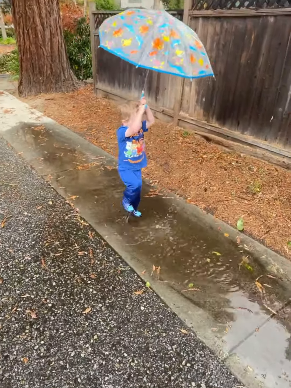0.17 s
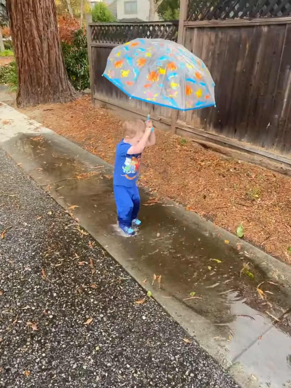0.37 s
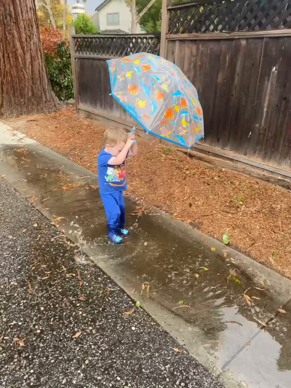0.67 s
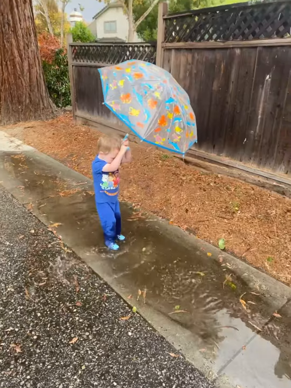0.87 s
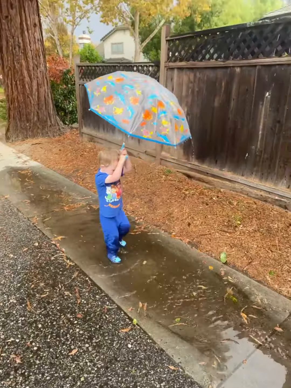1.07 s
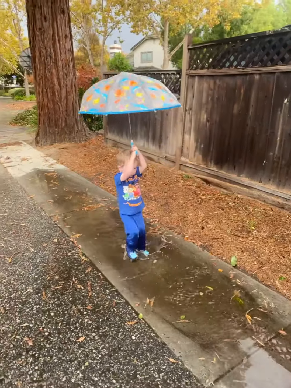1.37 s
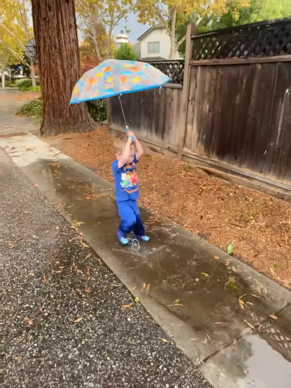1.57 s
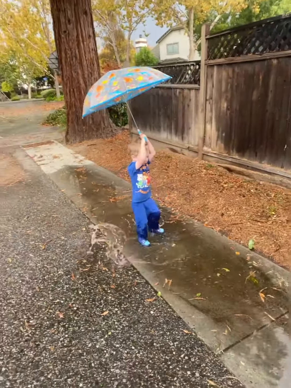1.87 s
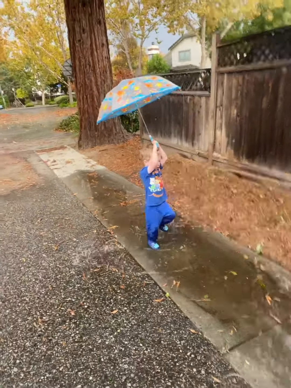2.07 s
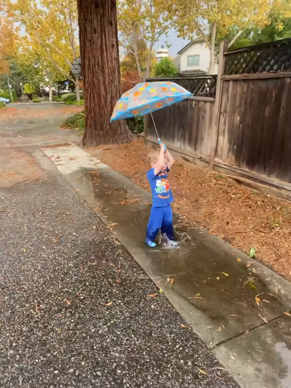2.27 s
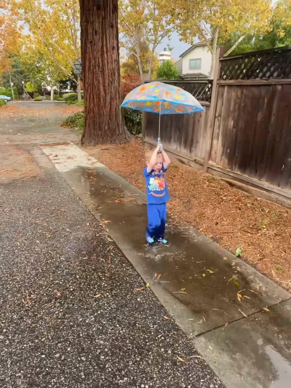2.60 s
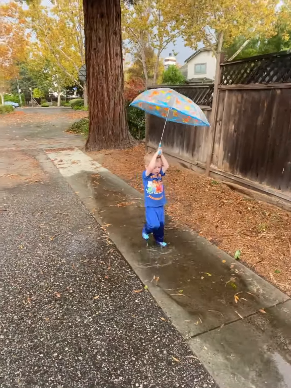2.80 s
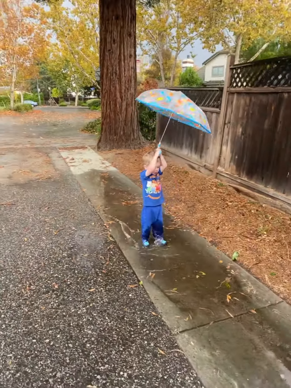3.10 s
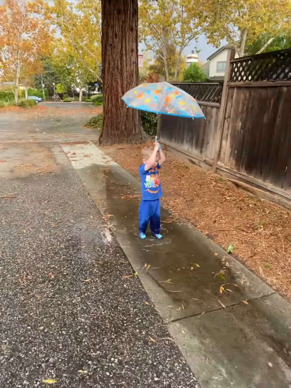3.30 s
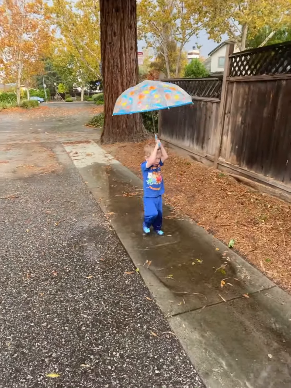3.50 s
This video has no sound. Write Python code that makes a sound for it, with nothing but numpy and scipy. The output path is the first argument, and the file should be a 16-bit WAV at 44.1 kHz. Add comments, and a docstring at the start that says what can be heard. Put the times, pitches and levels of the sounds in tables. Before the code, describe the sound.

Sharp splashing stomps in a shallow puddle outdoors, followed by spattering drops and small bubbly plinks.

```python
"""A small child stomps five times in a shallow gutter puddle, a few metres from the microphone.
Soles crack on the water (filtered pulses), squeeze out air pockets (falling sines) and throw spray (clicks).
Water patters back as ringing droplets, noise pings and rising bubble sines; a kicked sheet slaps down.
Echoes follow the water. Wind rumbles over quiet outdoor air; the sound cuts out briefly three times."""
import sys
import numpy as np
from scipy import signal
from scipy.fft import rfft, irfft
from scipy.io import wavfile
from scipy.ndimage import uniform_filter1d

SR = 44100
rng = np.random.default_rng(int(sys.argv[2]) if len(sys.argv) > 2 else 0)


def waveform_to_disk(signal):
    """Save audio, clipped to [-1, 1], as 16-bit WAV at the path in sys.argv[1]."""
    frames = np.transpose(np.atleast_2d(signal))
    scaled = np.clip(frames, -1, 1) * 32767
    samples = np.round(scaled).astype(np.int16)
    wavfile.write(sys.argv[1], SR, samples)


N = 160965


def amp(db):
    """Decibels to gain."""
    return 10 ** (np.asarray(db) / 20)


def unit(x):
    """Scales to rms 1."""
    return x / np.sqrt(np.mean(x ** 2) + 1e-20)


def add(mix, s, sound):
    """Mixes a sound in at time s."""
    part = mix[max(round(s * SR), 0):][:len(sound)]
    part += sound[:len(part)]


def colour(x, points, tilt_db_per_oct=0, size=4096):
    """Minimum-phase, unit-energy filter through (f/Hz, level/dB) points, tilted above 600 Hz."""
    octave = np.log2(np.fft.rfftfreq(size, 1 / SR) + 1)
    hz, db = np.transpose(points)
    curve_db = np.interp(octave, np.log2(hz), db)
    curve_db = curve_db + tilt_db_per_oct * np.maximum(octave, np.log2(600))
    # folding the cepstrum makes the filter causal
    cepstrum = irfft(np.log(amp(curve_db)))
    cepstrum[1:size // 2] *= 2
    cepstrum[size // 2 + 1:] = 0
    taps = irfft(np.exp(rfft(cepstrum)))
    return signal.fftconvolve(x, taps / np.linalg.norm(taps))[:len(x)]


def drift(hz):
    """Slow random wander of rms 1: noise under a Gaussian low-pass."""
    lowpass = np.exp(-(np.fft.rfftfreq(N, 1 / SR) / hz) ** 2)
    return unit(irfft(rfft(rng.standard_normal(N)) * lowpass, N))


def clicks(per_s, spread_db):
    """Random impacts of uneven size and either sign, rms 1."""
    size = amp(spread_db * np.minimum(rng.exponential(1, N), 4))
    sign = rng.choice([-1, 1], N)
    return unit(size * sign * (rng.random(N) < per_s / SR))


CLUMP_DB, CLUMP_HZ = 4.5, 200


def clumped(x):
    """Water comes in uneven spurts of a few milliseconds."""
    return unit(x * amp(CLUMP_DB * np.tanh(drift(CLUMP_HZ))))


def shower(s, rise_s, fall_s):
    """Water arrives gradually, peaks at s and thins out."""
    t = np.arange(N) / SR
    return np.exp(-(abs(t - s) / np.where(t < s, rise_s, fall_s)) ** 1.5 / 2)


# wind buffets and low thuds: t/s, level/dB, half length/s
BUFFETS = [(0.19, -45, 0.023), (0.247, -36.5, 0.0044), (0.651, -41, 0.0085), (1.587, -44.5, 0.023),
           (1.813, -45.5, 0.024), (1.936, -41.5, 0.0072), (2.26, -33.5, 0.0088), (2.296, -36, 0.008),
           (2.768, -41, 0.014)]
# wind rumble spectrum: f/Hz, level/dB
WIND_SPECTRUM = [(30, -55), (50, -11), (78, -1.5), (115, -8), (170, -11.5), (260, -15), (450, -49.5),
                 (2000, -97.5)]
# outdoor air spectrum: f/Hz, level/dB
AIR_SPECTRUM = [(40, -46.5), (130, 6), (280, 1), (400, -4), (600, -4.5), (950, -1), (1600, -6), (2500, -13),
                (8000, -32), (16000, -44.5)]
BUFFET_HZ, BUFFET_WANDER = 84.4, 0.1886  # wander: rms share of pitch
WIND_DB, GUST_DB, GUST_HZ, AIR_DB = -52, 2.5, 2.8, -52


def wind():
    """Gusty low noise and single wavering low-pitched buffets, over steady outdoor air."""
    t = np.arange(N) / SR
    gusts = amp(WIND_DB + GUST_DB * drift(GUST_HZ))
    rumble = gusts * unit(colour(rng.standard_normal(N), WIND_SPECTRUM, size=16384))
    swell = sum(amp(db) * np.exp(-((t - s) / half_s) ** 2 / 2) for s, db, half_s in BUFFETS)
    pitch_hz = BUFFET_HZ * (1 + BUFFET_WANDER * drift(34.6))
    buffets = np.sqrt(2) * swell * np.sin(2 * np.pi * np.cumsum(pitch_hz) / SR)
    air = amp(AIR_DB) * unit(colour(rng.standard_normal(N), AIR_SPECTRUM))
    return rumble + buffets + air


DROP_SPREAD_DB, DROP_CYCLES = 3.7, 6  # spread of sizes; cycles to decay by 1/e
DROP_CLIMB = 0.0099  # share of pitch gained per cycle


def droplets(per_s, count=48):
    """Random drops, each ringing a few cycles at its own rising pitch; rms 1."""
    out = np.zeros(N)
    for hz in np.geomspace(550, 11500, count):
        cycles = np.arange(int(5 * DROP_CYCLES * SR / hz)) * hz / SR
        shape = (1 - np.exp(-2 * cycles)) * np.exp(-cycles / DROP_CYCLES)
        ring = shape * np.sin(2 * np.pi * cycles * (1 + DROP_CLIMB * cycles / 2))
        chance = rng.random(N) * SR * count / per_s
        for at in np.flatnonzero(chance < 1):
            size = amp(DROP_SPREAD_DB * min(-np.log(chance[at]), 3))
            add(out, at / SR, size * np.sqrt(hz) * ring)  # root: even energy across pitches
    return unit(out)


SPRAY_PER_S, SPRAY_SPREAD_DB = 9000, 2.8
# thrown water coming down: densest t/s, level/dB, rise/s, fall/s, brightness/(dB per octave)
SPLATTERS = [(.725, -50, 0.079, 0.15, 0.5), (1.572, -45.5, 0.051, 0.085, 0.5),
             (1.82, -55, 0.021, 0.096, 1.5), (1.99, -50.5, 0.043, 0.058, 3.5),
             (2.541, -49.5, 0.11, 0.084, 0), (3.22, -47, 0.039, 0.043, -1)]
# falling water spectrum: f/Hz, level/dB
PATTER_SPECTRUM = [(300, -16), (900, 1.5), (1700, 6), (2900, 1), (5200, -5.5), (8500, -16), (16000, -31)]
DROPS_PER_S, DRIPS_PER_S = 1800, 160
MIST_DB, DRIP_DB = -6, -63.5  # mist relative to the droplets


def splatter():
    """Showers of ringing drops and fine click mist, with stray drips at all times."""
    rain = droplets(DROPS_PER_S) + amp(MIST_DB) * clicks(SPRAY_PER_S, SPRAY_SPREAD_DB)
    out = np.zeros(N)
    for s, db, rise_s, fall_s, tilt in SPLATTERS:
        out += amp(db) * shower(s, rise_s, fall_s) * unit(colour(rain, PATTER_SPECTRUM, tilt))
    return out + amp(DRIP_DB) * unit(colour(droplets(DRIPS_PER_S), PATTER_SPECTRUM))


# air squeezed from under a sole: t/s, level/dB, first f/Hz, time to halve f above POCKET_LOW_HZ/s, decay/s
POCKETS = [(0.3777, -17.5, 2000, 0.00082, 0.0051), (.382, -24, 327, 0.0093, 0.012),
           (0.3882, -26, 2113, 0.017, 0.0072), (1.2724, -6.5, 2530, 0.0045, 0.0006),
           (1.2804, -22.5, 2830, 0.0015, 0.0016), (1.6006, -21.5, 1325, 0.00543, 0.0046),
           (1.617, -25.5, 393, 0.0058, 0.012), (2.215, -13.5, 3100, 0.00287, 0.0014),
           (2.2162, -28, 1300, 0.0084, 0.0036), (2.225, -32.5, 1814, 0.00072, 0.01),
           (2.9541, -25.5, 1960, 0.0013, 0.0021), (2.973, -32.5, 375, 0.005, 0.0059)]
POCKET_RISE_S, POCKET_LOW_HZ = 0.0006, 111


def pockets():
    """A pocket of air pops, its pitch diving as the cavity opens."""
    out, t = np.zeros(N), np.arange(SR // 12) / SR
    for s, db, hz, half_s, decay_s in POCKETS:
        pitch_hz = POCKET_LOW_HZ + (hz - POCKET_LOW_HZ) / (1 + t / half_s)
        shape = (1 - np.exp(-t / POCKET_RISE_S)) * np.exp(-t / decay_s)
        add(out, s, amp(db) * shape * np.sin(2 * np.pi * np.cumsum(pitch_hz) / SR))
    return out


# sharp smacks of a sole's edge: t/s, pulse level/dB, crackle width/s
SMACKS = [(0.3779, -15.5, 0.0012), (1.2738, -23, 0.0012), (1.5864, -23, 0.0014), (1.6003, -30, 0.0015),
          (2.2133, -26.5, .0007), (2.216, -29, .0005)]
# smack spectrum: f/Hz, level/dB
SMACK_SPECTRUM = [(200, 2.5), (2500, 16), (5000, 9.5), (12000, -8), (16000, -32)]
CRACKLE_DB = -14  # relative to the pulse, before filtering


def smacks():
    """The sole's edge meets the water: a sharp pulse inside a brief swell of crackle."""
    out, middle = np.zeros(N), SR // 60
    t = (np.arange(2 * middle) - middle) / SR
    pulse = signal.unit_impulse(2 * middle, middle)
    for s, db, width_s in SMACKS:
        crackle = amp(CRACKLE_DB) * rng.standard_normal(len(t)) * np.exp(-abs(t) / width_s)
        smack = colour(crackle - pulse, SMACK_SPECTRUM) / colour(pulse, SMACK_SPECTRUM).max()
        add(out, s - middle / SR, amp(db) * smack)
    return out


# spray from under a sole: t/s, level/dB, hold/s, decay/s, brightness/(dB per octave)
STOMPS = [(0.3811, -32, 0.013, 0.006, 1), (1.276, -35, 0.007, 0.01, 2), (1.596, -28.5, 0.0043, 0.016, -1),
          (2.2115, -29.5, 0.0021, 0.0096, 3), (2.9379, -38.5, 0.0058, 0.026, 1.5)]
# spray spectrum: f/Hz, level/dB
SPRAY_SPECTRUM = [(100, 11), (500, 7), (1800, 2.5), (3200, -3), (5200, -7.5), (8500, -18), (12000, -30.5),
                  (16000, -35)]
SPRAY_RISE_S, BASS_LAG_S, BASS_HZ = 0.001, 0.0033, 866


def sprays():
    """Water tears into dense droplets while the sole comes down: treble first, then bass."""
    out, t = np.zeros(N), np.arange(SR // 5) / SR
    highpass = signal.butter(2, BASS_HZ, "high", fs=SR, output="sos")
    full = 1 - np.exp(-(t / BASS_LAG_S) ** 2)
    for s, db, hold_s, decay_s, tilt in STOMPS:
        shape = np.minimum(t / SPRAY_RISE_S, 1) * np.exp(-np.maximum(t - hold_s, 0) / decay_s)
        grains = clumped(clicks(SPRAY_PER_S, SPRAY_SPREAD_DB))[:len(t)]
        spray = colour(shape * grains, SPRAY_SPECTRUM, tilt)
        spray *= np.linalg.norm(shape) / np.linalg.norm(spray)
        thin = signal.sosfilt(highpass, spray)
        add(out, s, amp(db) * (full * spray + (1 - full) * thin))
    return out


BUBBLE_RISE_S, BUBBLE_CURVE = 0.0018, 1.61
BUBBLE_FADE, BUBBLE_SWELL = 1.6, 1.53  # dies over its life, but grows louder as it climbs
BUBBLE_WOBBLE = .24  # rms: share of level, and radians of phase


def bubble(hz, double_s, life_s):
    """A ringing bubble wobbles and climbs in pitch until it bursts."""
    t = np.arange(0, 2 * life_s, 1 / SR)
    climb = 1 + (t / double_s) ** BUBBLE_CURVE
    fade = np.exp(-BUBBLE_FADE * t / life_s - (t / life_s) ** 10)
    shape = (1 - np.exp(-t / BUBBLE_RISE_S)) * climb ** BUBBLE_SWELL * fade
    noise = uniform_filter1d(rng.standard_normal((2, SR // 4)), size=70, axis=1)
    level_wobble, phase_wobble = unit(noise)[:, :len(t)] * BUBBLE_WOBBLE
    return shape * (1 + level_wobble) * np.sin(2 * np.pi * np.cumsum(hz * climb) / SR + phase_wobble)


# bubbles nearing the surface: t/s, level/dB, f/Hz, time to double f/s, life/s
BUBBLES = [(.517, -39, 1623, 0.029, 0.019), (0.568, -31, 1265, 0.066, 0.0072),
           (.6028, -32, 2840, 0.042, 0.0071), (.848, -29, 1315, 0.0061, 0.0086),
           (0.899, -41.5, 1048, .071, 0.037), (0.9148, -38.5, 1640, 0.044, 0.013),
           (.808, -37, 1460, 0.021, 0.007), (1.396, -27, 1126, 0.0073, .0072),
           (1.465, -39, 2020, .083, 0.014), (1.5143, -32, 1490, 0.018, 0.0076),
           (1.534, -34, 1210, .019, 0.018), (1.8112, -36, 1110, 0.013, 0.0081),
           (1.879, -40.5, 1094, .06, 0.011), (1.936, -34, 1550, 0.056, 0.0077),
           (1.984, -21.5, 1820, .055, 0.0044), (2.4965, -34, 1490, 0.021, 0.012),
           (2.5683, -29.5, 1890, .048, 0.0056), (2.5992, -30.5, 1970, 0.05, 0.0086),
           (3.224, -34, 860, 0.069, .012)]


def plinks():
    """The larger bubbles left in the puddle, each a rising ring."""
    out = np.zeros(N)
    for s, db, *ring in BUBBLES:
        add(out, s, amp(db) * bubble(*ring))
    return out


# single big drops: t/s, peak level/dB, f/Hz
DROPS = [(0.676, -42, 4900), (.708, -33, 2780), (0.735, -41, 4800), (0.7957, -37.5, 4070),
         (0.846, -32.5, 3430), (0.881, -38.5, 3050), (1.563, -40, 3260), (1.661, -32.5, 3600),
         (1.9663, -37, 2420), (1.984, -40, 4740), (2.023, -35, 5240), (2.4272, -36, 3770),
         (2.4829, -39, 2110), (2.5308, -30.5, 2000), (2.567, -32.5, 2280), (3.18, -34.5, 2500),
         (3.36, -29, 1480), (3.375, -26, 1510)]
DROP_DECAY_S, DROP_WIDTH_OCT = 0.0022, 0.25


def drops():
    """A big drop bursts around its own pitch: a short ping of band-shaped noise."""
    out, t = np.zeros(N), np.arange(SR // 30) / SR
    skirt = ((-5, -20), (-1, -6), (0, 0), (1, -6), (4, -22), (12, -70))  # widths from f, level/dB
    for s, db, hz in DROPS:
        band = [(hz * 2 ** (k * DROP_WIDTH_OCT), level_db) for k, level_db in skirt]
        ping = colour(rng.standard_normal(len(t)) * np.exp(-t / DROP_DECAY_S), band)
        add(out, s, amp(db) * ping / abs(ping).max())
    return out


# sheet spectrum: f/Hz, level/dB
SHEET_SPECTRUM = [(100, -8), (280, 1.5), (500, -2), (1100, 0), (1500, 1), (2200, -7.5), (2900, -19),
                  (5000, -25.5), (16000, -58)]
SHEET_S, SHEET_DB, SHEET_RISE_S, SHEET_FALL_S, SHEET_PER_S = 3.37, -36.5, 0.021, 0.019, 3500


def sheet():
    """A mass of kicked water lands on the asphalt in spurts with a dull, grainy slap."""
    water = clumped(clicks(SHEET_PER_S, SPRAY_SPREAD_DB))
    return amp(SHEET_DB) * shower(SHEET_S, SHEET_RISE_S, SHEET_FALL_S) * unit(colour(water, SHEET_SPECTRUM))


ECHO_DB, ECHO_T60_S, FENCE_S = -15.5, 0.06, .008  # FENCE_S: delay before the first echoes


def street(x):
    """Short, sparse echoes from the fence and kerb: random decaying taps."""
    t = np.arange(SR // 3) / SR
    taps = rng.standard_normal(len(t)) * (rng.random(len(t)) < 1 / 20)
    taps *= (t > FENCE_S) * np.exp(-np.log(1000) * t / ECHO_T60_S)
    return x + amp(ECHO_DB) * signal.fftconvolve(x, taps / np.linalg.norm(taps))[:N]


def scene():
    """The water sounds in the street, with the wind."""
    stomps = pockets() + smacks() + sprays()
    falling = splatter() + plinks() + drops() + sheet()
    return (wind() + street(stomps + falling))[None]


# dropouts: from t/s, to t/s
GAPS = [(.223, .239), (1.7105, 1.7255), (3.5912, 3.606)]
EDGE_HZ = 16000


def record(dry):
    """The sound drops out briefly during GAPS; then a linear-phase low-pass limits the band."""
    t = np.arange(N) / SR
    live = uniform_filter1d(1. - sum((t > a) & (t < b) for a, b in GAPS), size=40)
    lowpass = signal.firwin(511, EDGE_HZ, window=("kaiser", 9), fs=SR)
    return signal.oaconvolve(dry * live, lowpass[None], "same")


dry = scene()
out = record(dry)
waveform_to_disk(out)
```